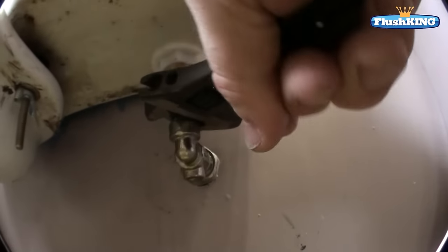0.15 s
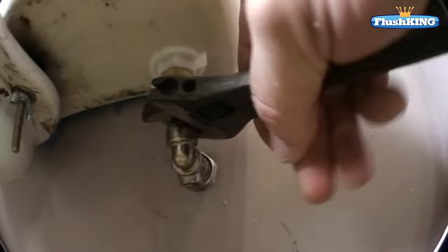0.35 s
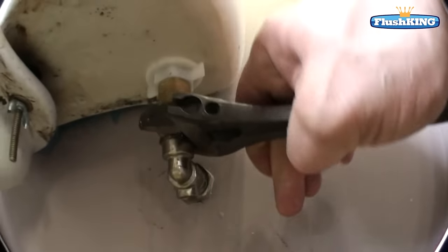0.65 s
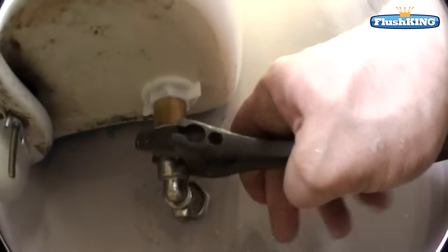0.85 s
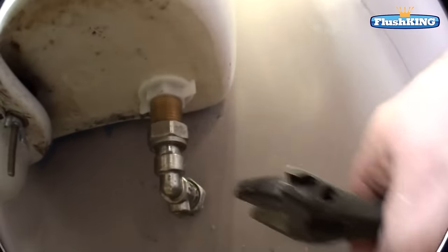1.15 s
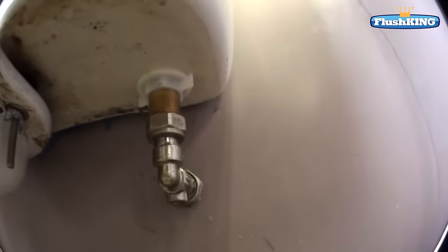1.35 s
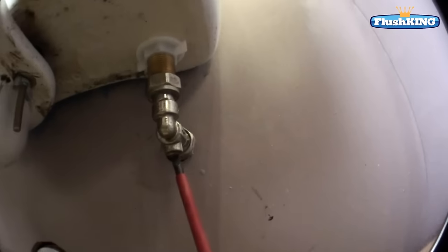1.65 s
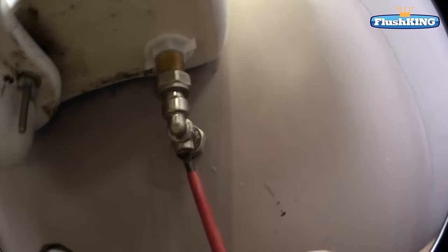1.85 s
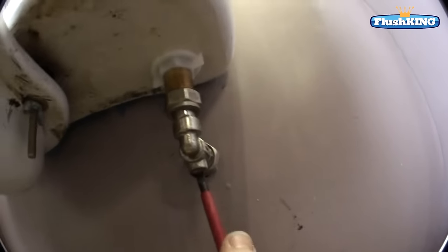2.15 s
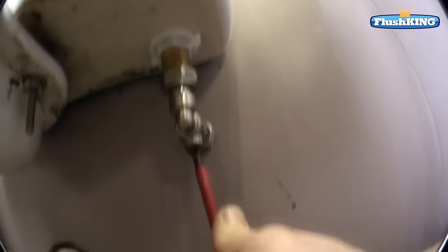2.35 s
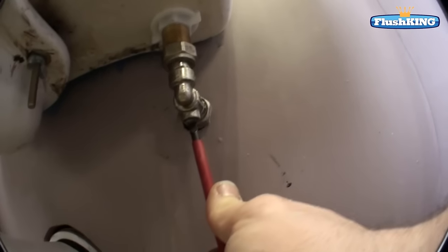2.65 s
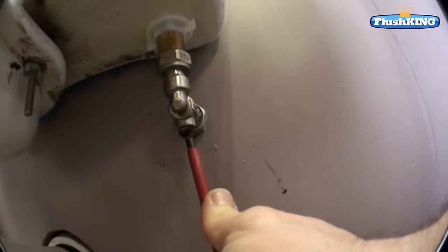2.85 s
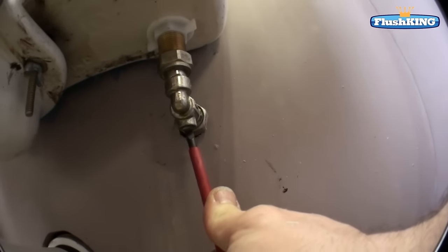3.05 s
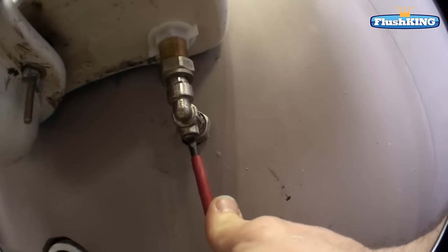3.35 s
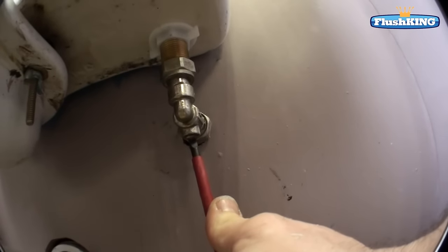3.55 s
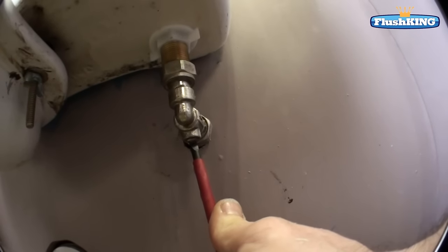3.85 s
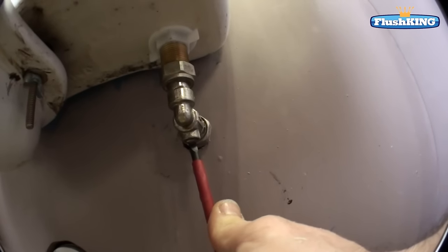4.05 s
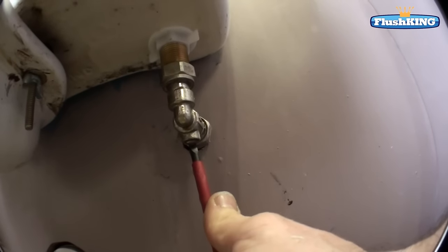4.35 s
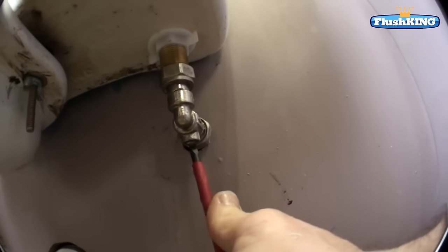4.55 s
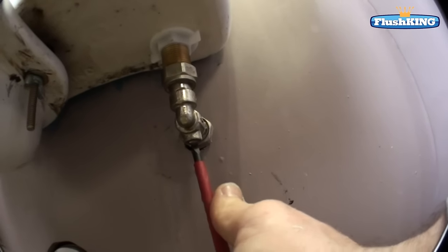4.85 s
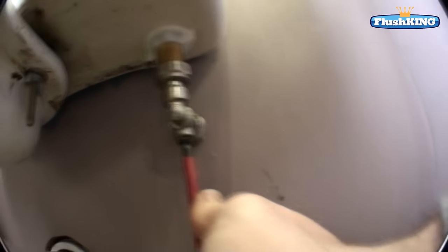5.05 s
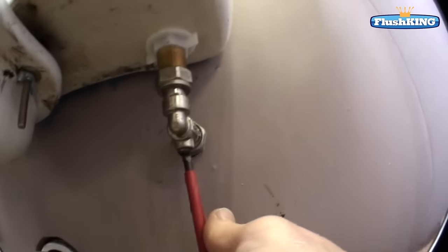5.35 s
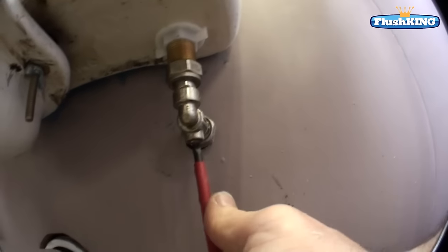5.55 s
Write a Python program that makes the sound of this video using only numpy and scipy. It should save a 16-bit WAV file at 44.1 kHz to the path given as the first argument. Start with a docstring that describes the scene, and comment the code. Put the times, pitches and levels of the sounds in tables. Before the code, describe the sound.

A close stereo perspective in a small, reflective bathroom, over low room rumble, light hiss and a barely audible whine. From 0 to 0.9 s, hands rub and shuffle while a tool gives faint clicks, soft thuds and, near 0.57 s, a short double tap ringing on the pipe. At about 0.95 s a gritty scrape swells, breaking into sharp steel clanks and jaw rattle at 1.05-1.13 s. The wrench hits the floor at 1.15 s, booming and bouncing until roughly 1.4 s. Small dry knocks and shuffles follow from 1.7 to 2.3 s, then near quiet with very faint bumps. At 3.17 s water starts as a thin, whistling, high hiss with a low pipe drone. It spits and bursts into bright spray at 3.75 s, then from 4.35 s swells into a fuller rush with hollow tank churning, the hiss slowly easing and dulling, with one spit near 5.27 s.

```python
"""Under a toilet cistern, a wrench catches on a pipe nut and rings it, scrapes off by stick-slip, clanks in
its damped steel modes and lands on the floor, which booms. A screwdriver then knocks into the isolating
valve and turns it. Water whistles as a turbulent jet in the narrow opening, bursts from the fill valve as a
spray of droplet noise and churns in the hollow cistern, a set of resonances. Hands rub and a body shuffles
during the tool work; rumble, hiss and a faint whine lie beneath throughout."""
import sys
import numpy as np
from scipy import signal
from scipy.fft import rfft, irfft
from scipy.io import wavfile
from scipy.ndimage import uniform_filter1d

SR = 44100
rng = np.random.default_rng(int(sys.argv[2]) if len(sys.argv) > 2 else 0)


def transcribe(signal):
    """Save signal, clipped to [-1, 1], as a 16-bit WAV file at the path in sys.argv[1]."""
    frames = np.atleast_2d(signal).T
    limited = np.clip(frames, -1, 1)
    pcm = np.round(limited * 32767).astype(np.int16)
    wavfile.write(sys.argv[1], SR, pcm)


N = 252252
TIME, BINS = np.arange(N) / SR, np.fft.rfftfreq(N, 1 / SR)  # s, Hz

# Levels of colours, modes and peaks are relative within each table.
# stereo field: (frequency [Hz], squared left-right coherence [0-1])
COHERENCE = [(130, 0.94), (640, 0.86), (1400, 0.67), (4000, 0.24), (14000, 0.86)]
# stereo field: (frequency [Hz], phase by which left leads [rad])
PHASE_LEAD = [(200, -0.136), (700, -1.18), (2000, -0.45), (11500, 0.13)]
# reverberation of the bathroom: (frequency [Hz], t60 [s])
ROOM_DECAY = [(300, 0.38), (3500, 0.23), (15000, 0.51)]
# colour of the background: (frequency [Hz], level [dB])
BACKGROUND_COLOUR = [(18, -27), (81, -1), (205, -4), (1600, -19.5), (6700, -25.5), (13200, -26.5),
                     (15000, -41)]
# movements of the person: (start [s], length [s], rubbing [dB], shuffling [dB])
MOVES = [(-0.01, 0.17, -50, -48), (0.189, 0.36, -49.5, -50), (0.56, 0.14, -53, -42),
         (0.747, 0.14, -53.5, -43), (0.944, 0.15, -49, -40), (1.194, 0.25, -53, -44.5),
         (1.706, 0.14, -57.5, -44), (1.888, 0.086, -57.5, -50.5), (1.962, 0.079, -51, -51.5)]
# colour of rubbing hands and tools: (frequency [Hz], level [dB])
RUB_COLOUR = [(300, -1), (3000, -1), (4200, -3.5), (9000, -4), (15000, -17)]
# colour of the shuffling body: (frequency [Hz], level [dB])
SHUFFLE_COLOUR = [(25, -27.5), (70, -1), (210, 2), (380, -14.5), (3000, -42.5)]
# dull contacts of hand and tool: (time [s], level [dB], starting pitch [Hz], length [s])
THUDS = [(0.393, -36.5, 160, 0.0091), (0.594, -27.5, 300, 0.0065), (0.614, -38, 290, 0.0083),
         (0.915, -34.5, 150, 0.015), (1.077, -17, 185, 0.048), (1.148, -16, 260, 0.052),
         (2.604, -51.5, 170, 0.035), (2.735, -49.5, 240, 0.032), (2.972, -40, 215, 0.035)]
# blows on pipe and fittings: (time [s], low thump [dB], hollow knock [dB], bright click [dB])
KNOCKS = [(0.055, -45, -65, -38), (0.376, -41.5, -40.5, -43.5), (0.881, -41.5, -47, -66),
          (0.951, -47, -37, -60), (1.058, -33, -20.5, -53), (1.108, -22.5, -17, -54),
          (1.719, -36.5, -41, -36), (2.035, -63, -33.5, -52), (2.102, -49, -45, -49),
          (2.286, -63, -40.5, -69)]
# colour of a hollow knock: (frequency [Hz], level [dB])
KNOCK_COLOUR = [(40, -10), (350, 2.5), (1000, -5.5), (2000, -16.5), (4000, -23.5), (15000, -61)]
# colour of a bright click: (frequency [Hz], level [dB])
CLICK_COLOUR = [(200, -38), (1600, 3.5), (8000, 2), (15000, -13.5)]
# modes of the floor and small room: (frequency [Hz], level [dB], t60 [s])
FLOOR_MODES = [(68, -7, 0.35), (85.2, 1.5, 0.42), (112.7, -7, 0.42), (137, -1.5, 0.3), (171, -9, 0.3),
               (216.8, 5.5, 0.27), (285, -8, 0.22), (475, -7, 0.23), (563, -11.5, 0.4), (1200, -24, 0.38)]
# tools grinding on fittings: (centre time [s], level [dB], centre [Hz], time to fall to exp(-2) [s])
GRINDS = [(0.325, -52, 2890, 0.068), (2.115, -55, 1100, 0.022), (2.8, -63, 2000, 0.045)]
# jaws squeaking on the nut: (centre time [s], level [dB], centre [Hz], time to fall to exp(-2) [s])
SQUEAKS = [(0.738, -48, 8100, 0.0031), (0.81, -49, 5970, 0.012)]
# the wrench catching on the nut: (time [s], level [dB])
TAPS = [(0.570, -39), (0.582, -44)]
# modes of pipe and cistern wall: (frequency [Hz], level [dB], t60 [s])
TAP_MODES = [(630, -4, 0.08), (861, -3, 0.1), (1104, -1, 0.08), (2100, -7, 0.03)]
# steel on hard things: (time [s], ring [dB], crack [dB])
CLANKS = [(0.988, -52.5, -45), (1.011, -40.5, -41), (1.039, -51, -35.5), (1.055, -47, -19),
          (1.0756, -20.5, -12.5), (1.087, -25.5, -21), (1.113, -41, -29), (1.134, -40.5, -28)]
# modes of the wrench: (frequency [Hz], level [dB], t60 [s])
WRENCH_MODES = [(1265, -16, .22), (1842, -11, .11), (2385, -6, .05), (2505, -5, .1), (2630, -7, .04),
                (3516, -1.5, .15), (3574, -8, .15), (3852, -8, .08), (5238, -14, .1), (5555, -13, .1),
                (6580, -17, .08), (8550, -20, .08)]
# colour of a steel crack: (frequency [Hz], level [dB])
CRACK_COLOUR = [(200, -23), (1500, -15.5), (2500, 2.5), (4200, -0.5), (8000, -4), (15000, -25.5)]
# the wrench landing and bouncing: (time [s], low thump [dB], hollow knock [dB])
LANDING = [(1.149, -10.5, -13.5), (1.164, -12, -13), (1.195, -20, -15), (1.231, -15.5, -22),
           (1.265, -29.5, -23.5), (1.299, -24, -46), (1.357, -34.5, -48), (1.41, -43.5, -49)]
# starts of three flows: the valve opens, the air is out of the pipe, water pours into the cistern
OPEN_S, BURST_S, POUR_S = 3.165, 3.755, 4.347
# surges of water: (start [s], rise [s], ebb [dB/s], valve jet [dB], spray [dB], spray brightness [dB/octave])
SURGES = [(OPEN_S, 0.086, 5.1, -35.5, -48.5, 0), (BURST_S, 0.058, 11.5, -57, -28, 0.46),
          (POUR_S, 0.42, 11.8, -34.5, -28, 4.7)]
# resonances of the pipe: (frequency [Hz], half-width [Hz], level [dB])
PIPE_PEAKS = [(89.6, 7, -7), (142.7, 10, -3), (200.2, 13, 0.5), (257, 68, -11)]
# resonances of the cistern: (frequency [Hz], half-width [Hz], level empty [dB], level as water pours in [dB])
CISTERN_PEAKS = [(358.6, 16.7, 3.5, 0.5), (399, 12, -1.5, -3.5), (494, 26, -5, -10), (563.5, 20.6, -10, -6),
                 (667, 6.6, -7.5, -5), (748, 53, -5, -7), (875, 51, -8, -13), (1063, 25, -7, -9),
                 (1101, 10.4, 5, -2.5), (1258, 32, -4.5, -12.5), (1426, 15, -6.5, -19),
                 (1813, 50, -3, -15.5)]
# colour of the wash between the cistern resonances: (frequency [Hz], level [dB])
WASH_COLOUR = [(30, -62), (450, -25.5), (1400, -24.5), (3000, -27.5), (8000, -49)]
# colour of the spray: (frequency [Hz], level [dB])
SPRAY_COLOUR = [(900, -1), (1550, -6.5), (2100, -2), (4600, 1.5), (8700, -1.5), (11500, -10.5),
                (15000, -28)]
# whistles of the jet in the narrow valve: (frequency [Hz], level [dB])
JET_PEAKS = [(2460, -10), (4200, -13), (4750, -14), (5620, -4), (5880, -1), (6220, -11), (6540, -6),
             (6950, -5), (7740, -2.5), (8390, 3), (9050, 2.5), (9350, -6), (9860, -6), (11080, -16),
             (11500, -6), (11900, -6), (12500, -3), (13520, -14)]
# colour of the hiss of the jet: (frequency [Hz], level [dB])
JET_COLOUR = [(2850, -9.5), (5000, -5), (5800, -4), (9300, -0.5), (10700, -7.5), (13000, -10), (14000, -14)]
# air pockets spitting: (centre time [s], level [dB], centre [Hz], time to fall to exp(-2) [s])
SPITS = [(3.554, -29, 6230, 0.019), (3.746, -34.5, 6033, 0.094), (3.797, -34.5, 2974, 0.035),
         (3.839, -28, 4160, 0.029), (3.847, -28.5, 7600, 0.03), (5.272, -31, 7240, 0.043)]

EDDY_DB = 2.2  # rms wavering of turbulent bands


def gain_of(db):
    """Level: decibels converted to amplitude."""
    return 10 ** (np.asarray(db) / 20)


def evened(x):
    """Normalisation: scales a signal to rms 1."""
    return x / np.sqrt(np.mean(x ** 2) + 1e-20)


def read(points, hz=BINS):
    """Interpolation: joins a table over frequency along a log axis."""
    f, value = np.transpose(points)
    return np.interp(np.log(hz + 1), np.log(f + 1), value)


def add(mix, s, sound):
    """Superposition: sums a sound into the mix from time s."""
    part = mix[..., max(round(s * SR), 0):][..., :sound.shape[-1]]
    part += sound[..., :part.shape[-1]]


def together(gains):
    """Incoherent addition: unrelated sounds add in power."""
    return np.sqrt(sum(g ** 2 for g in gains))


def ramp(start, rise):
    """Smooth onset: a squared-sine step from 0 to 1."""
    return np.sin(np.pi / 2 * np.clip((TIME - start) / rise, 0, 1)) ** 2


def envelope(start, length, attack, sag_db_per_s, release_db_per_s):
    """Exponential decay: attack, a hold that sags (or swells), then a faster release."""
    t = TIME - start
    sag_db = sag_db_per_s * np.clip(t, 0, length)
    release_db = release_db_per_s * np.maximum(t - length, 0)
    return ramp(start, attack) * gain_of(-sag_db - release_db)


def surge(start, rise, ebb_db_per_s):
    """Exponential ebb: a flow swells, then weakens by a steady number of decibels per second."""
    return ramp(start, rise) * gain_of(-ebb_db_per_s * np.maximum(TIME - start - rise, 0))


def flutter(rate_hz, depth_db):
    """Amplitude modulation: low-passed noise wavers the level in decibels."""
    wander = irfft(rfft(rng.standard_normal(N)) / (1 + (BINS / rate_hz) ** 4), N)
    return gain_of(depth_db * evened(wander))


def resonances(peaks):
    """Resonance: (frequency, half-width, dB) peaks with steep skirts, summed in power over frequency."""
    return np.sqrt(sum(gain_of(db) ** 2 / (1 + ((BINS - hz) / width) ** 2) ** 2 for hz, width, db in peaks))


def ripple(width_hz, depth_db):
    """Standing waves: fixed fine peaks and dips over frequency from pipe, tank and room."""
    bins = max(round(width_hz * N / SR), 1)
    return gain_of(depth_db * evened(uniform_filter1d(rng.standard_normal(len(BINS)), bins)))


def ports(x):
    """Coherence: two unrelated signals are blended into what two close microphone ports hear."""
    size = x.shape[-1]
    hz = np.fft.rfftfreq(size, 1 / SR)
    coherence = np.clip(read(COHERENCE, hz), 0, 1) ** .5
    a, b = rfft(x)
    mid = a * np.sqrt((1 + coherence) / 2)
    side = b * np.sqrt((1 - coherence) / 2)
    turn = np.exp(.5j * read(PHASE_LEAD, hz))
    return irfft([(mid + side) * turn, (mid - side) / turn], size)


def noise(gain, drops_per_s=0., drop_share=0.):
    """Filtered noise: coloured stereo of rms 1, to which sparse impulses add droplets or slips."""
    x = rng.standard_normal((2, N))
    if drops_per_s:
        drops = rng.standard_normal((2, N)) * (rng.random((2, N)) < drops_per_s / SR)
        x = x + drop_share * evened(drops)
    return evened(ports(irfft(rfft(x) * gain, N)))


def turbulent(x, depth_db):
    """Turbulence: eddies make narrow bands of a hiss swell and fade, each on its own."""
    z = signal.stft(x, nperseg=1024, noverlap=768)[2]
    eddies = uniform_filter1d(rng.standard_normal(z.shape[1:]), size=9, axis=0)
    eddies = uniform_filter1d(eddies, size=12, axis=1)
    wavering = z * gain_of(depth_db * evened(eddies))
    return evened(signal.istft(wavering, nperseg=1024, noverlap=768)[1][:, :N])


def swishes(rows, width_share):
    """Band-passed noise: Gaussian swells, each in a resonance with half-width a share of its pitch."""
    out = np.zeros((2, N))
    for s, db, hz, length in rows:
        swell = gain_of(db) * np.exp(-2 * ((TIME - s) / length) ** 2)
        out += swell * noise(resonances([(hz, width_share * hz, 0)]))
    return out


def stirred(modes, scatter_db):
    """Modal excitation: each blow drives every mode a little more or less strongly."""
    return [(hz, db + scatter_db * rng.standard_normal(), t60) for hz, db, t60 in modes]


def ring(modes, spread, lag=0.):
    """Free vibration: decaying modes; left lags by lag radians at 200 Hz, give or take spread."""
    t = TIME[:SR]
    shifts = spread * rng.uniform(-1.2, 1, (len(modes), 2, 1))
    shifts = shifts + np.array([[[-lag * np.sqrt(hz / 200)], [0]] for hz, _, _ in modes])
    x = np.zeros((2, SR))
    for k, (hz, db, t60) in enumerate(modes):
        x += gain_of(db - 60 * t / t60) * np.sin(2 * np.pi * hz * t + shifts[k]) * (-1) ** k
    x = x / np.std(x[:, :round(.03 * SR)])  # rms 1 over 30 ms, before the soft onset
    return x * (1 - np.exp(-t / .0008))


def burst(colour, t60):
    """Impact noise: a contact makes a dense, random-phase rattle that dies exponentially."""
    size = 8192
    phases = np.exp(2j * np.pi * rng.random((2, size // 2 + 1)))
    x = irfft(phases * gain_of(read(colour, np.fft.rfftfreq(size, 1 / SR))))
    t = TIME[:size]
    return evened(ports(x)) * gain_of(-60 * t / t60) * (1 - np.exp(-t / 0.0005))


def bathroom(x):
    """Reverberation: hard walls give a dense tail, each band dying at its own speed."""
    late = rng.standard_normal((2, SR)) * (TIME[:SR] > .004)
    hz, t, z = signal.stft(late, SR, nperseg=256)
    decay = gain_of(-60 * t / read(ROOM_DECAY, hz)[:, None])
    tail = ports(signal.istft(z * decay, SR, nperseg=256)[1])
    return signal.fftconvolve(x.mean(0)[None], tail / np.linalg.norm(tail[0]), axes=1)[:, :N]


def knocks(rows, room_db, rattle_t60):
    """Impact excitation: each blow stirs the floor's modes and knocks in the struck part."""
    contacts, booms = np.zeros((2, N)), np.zeros((2, N))
    for s, thump_db, knock_db, *_ in rows:
        add(booms, s, gain_of(thump_db) * ring(stirred(FLOOR_MODES, 2), spread=0.25, lag=0.85))
        add(contacts, s, gain_of(knock_db) * burst(KNOCK_COLOUR, rattle_t60))
    panned = booms * gain_of([[-1.1], [1.1]])  # left, right
    return panned + contacts + gain_of(room_db) * bathroom(contacts)


def background():
    """Stationary noise and a pure tone: room rumble, microphone hiss and a faint electronic whine."""
    whine = np.sin(2 * np.pi * 6600 * TIME)
    return gain_of(-56) * noise(gain_of(read(BACKGROUND_COLOUR))) + gain_of(-73) * whine


def handling():
    """Friction noise: each movement rubs hands and sleeve over the low shuffle of someone crouching."""
    attack_s, sag_db_per_s = 0.01, 6
    rub = together(gain_of(db) * envelope(s, length, attack_s, sag_db_per_s, release_db_per_s=168.5)
                   for s, length, db, _ in MOVES)
    shuffle = together(gain_of(db) * envelope(s, length, attack_s, sag_db_per_s, release_db_per_s=167.5)
                       for s, length, _, db in MOVES)
    rubbing = rub * noise(gain_of(read(RUB_COLOUR))) * flutter(rate_hz=67, depth_db=1.0)
    return rubbing + shuffle * noise(gain_of(read(SHUFFLE_COLOUR)))


def thuds():
    """Contact stiffness: soft, heavy contacts give low cycles whose pitch sags as the pressure eases."""
    out = np.zeros(N)
    for s, db, hz, length in THUDS:
        pitch = hz * (1 - 0.3 * np.clip((TIME - s) / length, 0, 1))
        turns = np.cumsum(pitch * flutter(rate_hz=90, depth_db=1.1)) / SR
        strength = envelope(s, length, attack=0.0063, sag_db_per_s=0, release_db_per_s=403)
        out += gain_of(db) * strength * np.sin(2 * np.pi * turns)
    return out + gain_of(-8) * bathroom(out[None])


def fittings():
    """Impact and friction: tools knock on the pipe with a bright click, and also grind and squeak."""
    t60_s, room_db = 0.05, -4.5
    out = swishes(GRINDS, width_share=0.5) + swishes(SQUEAKS, width_share=0.086)
    for s, _, _, click_db in KNOCKS:
        add(out, s, gain_of(click_db) * burst(CLICK_COLOUR, t60_s))
    return out + gain_of(room_db) * bathroom(out) + knocks(KNOCKS, room_db, t60_s)


def pipe_taps():
    """Modal ringing: the wrench catches on the nut, and a short knock rings pipe and cistern wall."""
    out = np.zeros((2, N))
    for s, db in TAPS:
        add(out, s, gain_of(db) * ring(stirred(TAP_MODES, 1.6), spread=0.91))
        add(out, s, gain_of(db + 11) * burst(KNOCK_COLOUR, t60=0.06))
    return out + gain_of(-5.5) * bathroom(out)


def scrape():
    """Stick-slip: jaws press ever harder off the nut; contact damps and widens the wrench modes."""
    drag = envelope(0.95, length=0.113, attack=0.0056, sag_db_per_s=-179, release_db_per_s=1303)
    nut = (810, 190, -1)  # nut and pipe under the jaws: Hz, half-width Hz, dB
    gripping = resonances([nut] + [(hz, 66, db - 8.5) for hz, db, _ in WRENCH_MODES])
    slips = noise(gripping, drops_per_s=300, drop_share=1.3)
    return gain_of(-49) * drag * flutter(rate_hz=70, depth_db=2.5) * slips


def jaw_rattle():
    """Damped resonance: the loose jaw rattles in widened modes of the wrench."""
    rattle = envelope(1.075, length=0.058, attack=0.0056, sag_db_per_s=67, release_db_per_s=600)
    return gain_of(-22.5) * rattle * noise(resonances([(hz, 320, db) for hz, db, _ in WRENCH_MODES]))


def wrench():
    """Modal vibration: scrape, rattle and clanks share the steel's modes; each clank stirs them anew."""
    out = scrape() + jaw_rattle()
    for s, ring_db, crack_db in CLANKS:
        add(out, s, gain_of(ring_db) * ring(stirred(WRENCH_MODES, 4.6), spread=1.0))
        add(out, s, gain_of(crack_db) * burst(CRACK_COLOUR, t60=0.028))
    return out + gain_of(-17.5) * bathroom(out)


def landing():
    """Repeated impact: the wrench bounces on the floor, farther off than the pipe and so wetter."""
    return knocks(LANDING, room_db=1.0, rattle_t60=0.067)


def cistern():
    """Cavity resonance: flow drones in the pipe and rings the tank; pouring favours low resonances."""
    full = ramp(BURST_S, rise=0.081)  # flow goes from thin to full
    pouring = ramp(POUR_S + .035, rise=0.22)
    drone_db = -39.5 * (1 - full) - 33.5 * full - 2 * pouring  # pouring eases the drone
    drone = gain_of(drone_db) * noise(resonances(PIPE_PEAKS))
    wash = gain_of(read(WASH_COLOUR))
    empty = noise(wash + resonances([(hz, width, db) for hz, width, db, _ in CISTERN_PEAKS]))
    churn = noise(wash + resonances([(hz, width, db) for hz, width, _, db in CISTERN_PEAKS]))
    hollow = np.sqrt(1 - pouring) * turbulent(empty, EDDY_DB)
    hollow = hollow + gain_of(8.5) * np.sqrt(pouring) * churn  # pouring lifts the cistern
    tank_db = -40.5 * (1 - full) - 36 * full
    return ramp(OPEN_S, rise=0.18) * (drone + gain_of(tank_db) * hollow)


def spray():
    """Droplet noise: a dense fizz; each surge has its own brightness and dulls as it ebbs."""
    colour = gain_of(read(SPRAY_COLOUR)) * ripple(width_hz=51, depth_db=1.5)
    dulling = 2.04  # dB per octave lost each second
    surges = []
    for s, rise, ebb, _, db, bright in SURGES:
        tilt = bright - dulling * np.maximum(TIME - s - rise, 0)
        surges.append((gain_of(db) * surge(s, rise, ebb), tilt))
    octave = np.log2((BINS + 1) / 6000)
    fizz = rfft(noise(colour, drops_per_s=2800, drop_share=0.61))
    out = np.zeros((2, N))
    for k in np.arange(-3, 2, .5):  # overlapping bands, in octaves from 6 kHz
        band = irfft(fizz * np.maximum(1 - 2 * abs(octave - k), 0), N)
        strength = together(level * gain_of(k * tilt) for level, tilt in surges)
        out += band * strength * flutter(rate_hz=16.5, depth_db=1.72)
    return out


def valve():
    """Jet noise: turbulence hisses and whistles in the narrow bore; air pockets spit as they pass."""
    bore = ripple(width_hz=90, depth_db=1.4)
    hiss = noise(bore * gain_of(read(JET_COLOUR)), drops_per_s=2300, drop_share=0.7)
    whistle = noise(resonances([(hz, 75, db) for hz, db in JET_PEAKS]))
    whistling = gain_of(0.5 - 10.0 * ramp(BURST_S, rise=0.2))  # dies back once the air is out of the pipe
    jet = together(gain_of(db) * surge(s, rise, ebb) for s, rise, ebb, db, _, _ in SURGES)
    flow = turbulent(hiss, EDDY_DB) + whistling * turbulent(whistle, EDDY_DB)
    return jet * flow + swishes(SPITS, width_share=0.15)


def scene():
    """Superposition: the background, the tools and then the water sum linearly."""
    tools = handling() + thuds() + fittings() + pipe_taps() + wrench() + landing()
    water = cistern() + spray() + valve()
    return background() + tools + water


def record(dry):
    """Dynamic compression and band limit: a limiter catches the loudest peaks and recovers slowly."""
    ceiling_db, recovery_db_per_s, edge_hz = -4, 45, 15150
    over_db = np.maximum(20 * np.log10(abs(dry).max(0) + 1e-9) - ceiling_db, 0)
    fall = TIME * recovery_db_per_s
    held_db = np.maximum.accumulate(over_db + fall) - fall
    limited = dry / gain_of(uniform_filter1d(held_db, size=40))
    low_pass = signal.firwin(511, edge_hz, window=("kaiser", 9), fs=SR)
    return signal.oaconvolve(limited, low_pass[None], "same")


dry = scene()
out = record(dry)
transcribe(out)
```